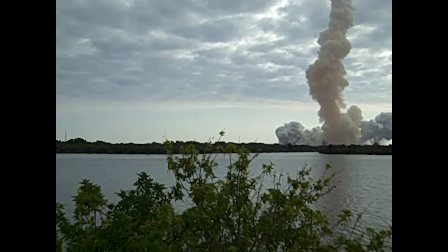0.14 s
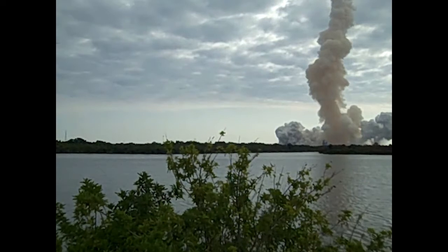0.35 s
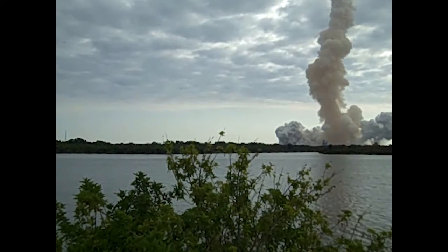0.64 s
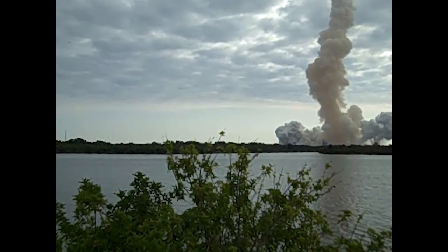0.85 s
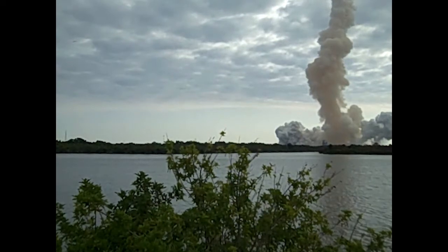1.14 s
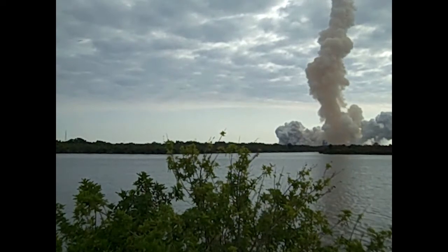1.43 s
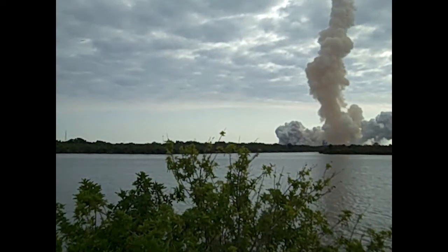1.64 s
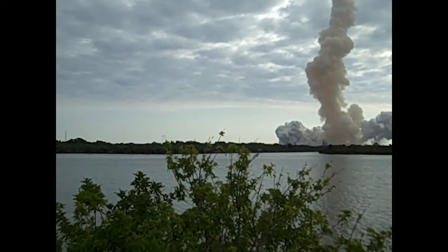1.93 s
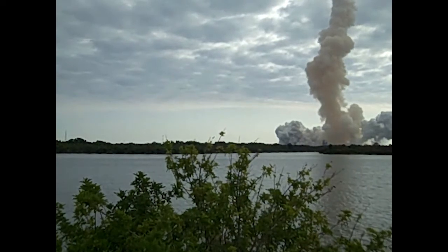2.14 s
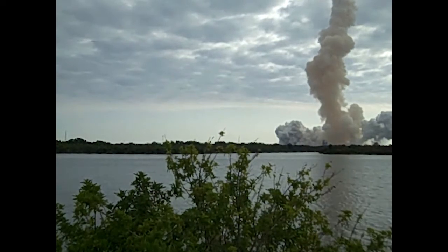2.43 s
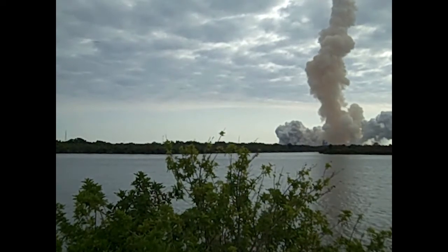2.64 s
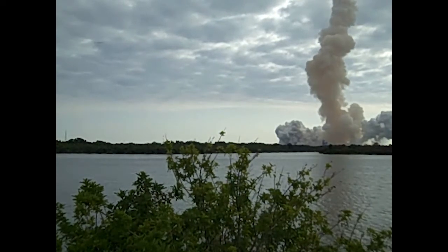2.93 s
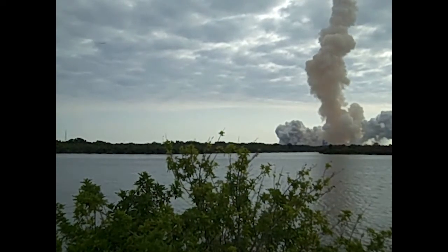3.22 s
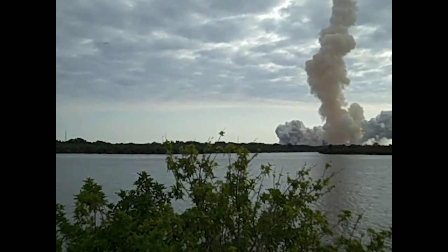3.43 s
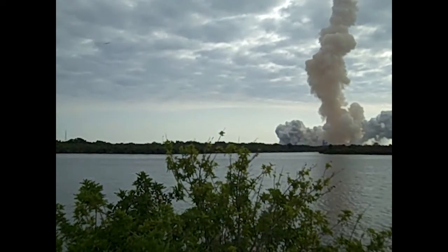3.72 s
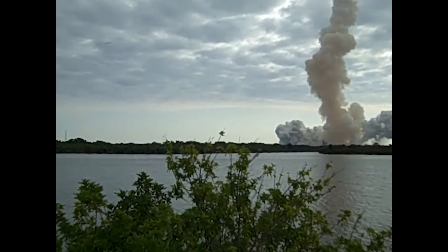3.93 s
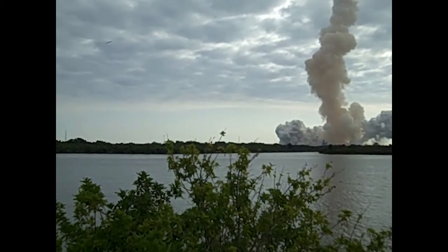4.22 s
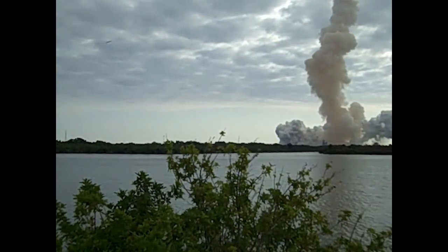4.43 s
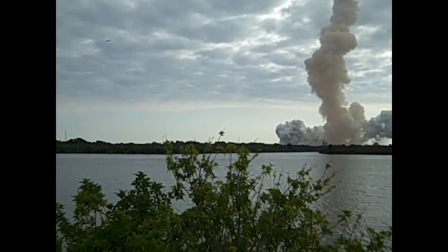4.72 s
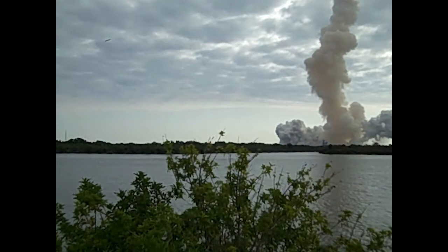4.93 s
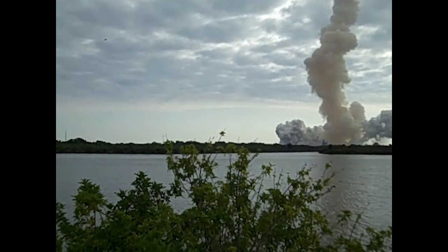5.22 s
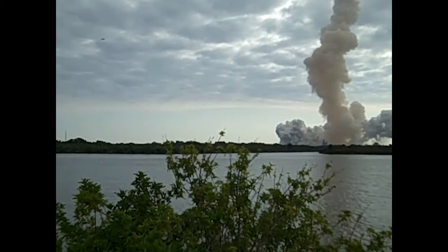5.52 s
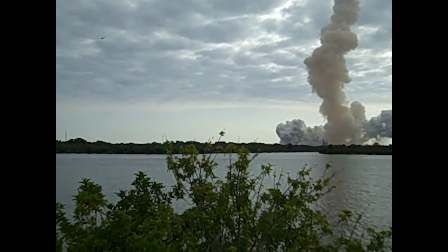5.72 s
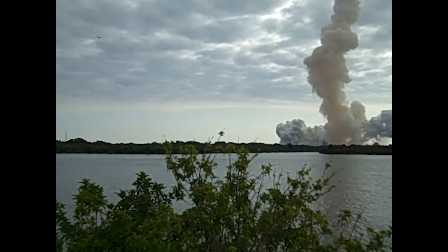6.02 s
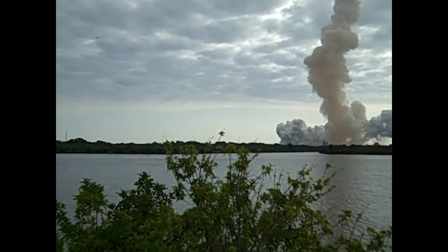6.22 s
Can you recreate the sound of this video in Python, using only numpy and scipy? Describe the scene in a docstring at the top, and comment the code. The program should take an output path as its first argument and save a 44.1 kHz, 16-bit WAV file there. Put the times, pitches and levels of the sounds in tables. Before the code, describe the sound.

A rocket climbs miles away across water, heard outdoors near bushes, with the roar already under way. From 0 to 1 s a low turbulent rumble is broken by rapid, uneven cracks, heavy and punchy with a short hollow ring. They thin slightly around 1.1-1.5 s, then surge from 1.7 to 2.4 s with some of the strongest blows, clipping the microphone. From 2.5 s they grow duller and sparser. Around 3.1-3.9 s the direct sound is shaded and weaker cracks arrive as bright rebounds. Near 4.1-4.4 s the crackle is faint; by 4.6 s it returns crisp and scattered, like leaves spitting. Around 5.2 s it is drier and snappy, with a very faint thin high whistle swelling briefly at 5.3 s. Until 6.3 s, mixed thuds and snaps trail sizzle and fizz over the continuing rumble, cutting off mid-roar.

```python
"""A rocket climbs, miles away across a lagoon: over a turbulent rumble its exhaust arrives as cracks, noise
steepened into shock fronts. Each rebounds close to the microphone and sets a hollow ring going; weak fronts
fill the gaps. Around 3.1-3.9 s the direct path is shaded and a bright rebound takes over; then leaves scatter
the fronts (4.6 s) and an open stretch leaves them dry (5.2 s), while a thin whistle swells once. A late sizzle
trails ever further behind each crack from 4.35 s. The strongest peaks clip."""
import sys
import numpy as np
from scipy import signal
from scipy.fft import rfft, irfft
from scipy.io import wavfile
from scipy.ndimage import uniform_filter1d

SR = 44100
rng = np.random.default_rng(int(sys.argv[2]) if len(sys.argv) > 2 else 0)


def master(y):
    """Save y as 16-bit WAV."""
    cut = np.clip(np.atleast_2d(y).T, -1, 1)
    pcm = np.round(cut * 32767)  # scale
    wavfile.write(sys.argv[1], SR, pcm.astype(np.int16))


N = 280470

# loud shock fronts: (time [s], relative level [dB], relative brightness [dB])
SHOCK_FRONTS = [(0.0183, -18, -11), (0.0612, -11.5, -2.5), (0.1297, -22, -1), (0.1706, -19, -15),
                (0.1984, -21, -16), (0.208, -21, -6), (0.241, -28, 3), (0.2941, -20, 1), (0.3336, -21.5, 2),
                (0.347, -21.5, 1), (0.3578, -9.5, -1), (0.413, -21, -13), (0.4356, -9, 2.5),
                (0.489, -20.5, -3), (0.524, -14.5, -8), (0.535, -14, 1.5), (0.557, -11, 0.5),
                (0.589, -14, 1), (0.64, -14.5, -10), (0.651, -19, 3.5), (0.6758, -15.5, -8),
                (0.708, -17.5, -8), (0.7529, -14.5, -6.5), (0.772, -8.5, 3), (0.805, -11, -2.5),
                (0.842, -11, 0.5), (0.914, -22, -10.5), (0.936, -13, 3), (0.982, -10.5, -2.5),
                (1.02, -24.5, -4.5), (1.036, -21, -13), (1.108, -25, -6.5), (1.1219, -18, -4),
                (1.241, -17, 0), (1.302, -22.5, -0.5), (1.317, -20, -3), (1.39, -28, -10),
                (1.4031, -19.5, -0.5), (1.449, -32, -14), (1.512, -26, -2), (1.552, -19, 3),
                (1.603, -15.5, 2.5), (1.6381, -17, 1), (1.6576, -17.5, 1), (1.6773, -16.5, 0),
                (1.699, -23, -5), (1.73, -5.5, 1), (1.766, -15.5, -4.5), (1.804, -13.5, -7),
                (1.8383, -12, -9.5), (1.907, -16, -15.5), (1.929, -16, -5), (1.956, -23, -28),
                (1.976, -11, -3.5), (2.0047, -16, -3.5), (2.0484, -9, 2.5), (2.086, -20, -11),
                (2.1005, -8.5, 1), (2.1502, -10.5, 3), (2.1876, -12.5, -7.5), (2.2348, -17.5, -16.5),
                (2.2802, -16, -10), (2.3048, -19, -8), (2.3836, -11.5, -3.5), (2.428, -26, -14),
                (2.4621, -11.5, -7.5), (2.514, -27, -10), (2.53, -20.5, -14.5), (2.5578, -19.5, -14),
                (2.598, -18.5, -14), (2.6674, -19.5, -12), (2.698, -17, -1.5), (2.72, -20.5, -15),
                (2.818, -27.5, -2), (2.908, -27, -15), (2.925, -16, 1), (2.9486, -32, -3), (2.959, -24, -2),
                (3.044, -26, -9), (3.075, -28.5, -8), (3.12, -25, -5.5), (3.152, -28, -4), (3.184, -23, -7),
                (3.2414, -18, 2.5), (3.2684, -22.5, 1.5), (3.2943, -20.5, 3), (3.3479, -27, 8.5),
                (3.374, -17, 8.5), (3.421, -25, 9), (3.4533, -20, 5), (3.546, -24, -2.5),
                (3.59, -27.5, 6.5), (3.6093, -28, 7.5), (3.6363, -18, 11.5), (3.6861, -20.5, 7),
                (3.784, -27, 0), (3.804, -20.5, 7.5), (3.893, -27.5, 5), (3.9841, -25.5, 4.5),
                (4.0168, -24, 0.5), (4.069, -29, -3), (4.1, -37, 18.5), (4.115, -25, 8.5),
                (4.15, -38.5, 13), (4.184, -38, 10), (4.253, -37, 11), (4.27, -27, 10.5), (4.307, -28, 13),
                (4.3275, -26.5, 6.5), (4.416, -35, 15.5), (4.424, -26.5, 11), (4.4347, -24.5, 16.5),
                (4.487, -25.5, 17.5), (4.519, -27, 5), (4.533, -21.5, 13), (4.5784, -19, 14.5),
                (4.606, -27, -3), (4.6338, -20.5, 17), (4.661, -26.5, 13), (4.679, -24.5, 8.5),
                (4.69, -30, 6), (4.7001, -21.5, 9.5), (4.741, -25, 13), (4.799, -18.5, 12),
                (4.8489, -21, 10.5), (4.865, -16.5, 14), (4.908, -26, 6), (4.938, -15, 14),
                (5.0315, -14.5, 13), (5.085, -23.5, 13), (5.1021, -21, 17), (5.1276, -20, 15),
                (5.141, -20.5, 5), (5.1719, -22, 13), (5.2141, -22.5, 13.5), (5.223, -22, 10),
                (5.244, -20, 10), (5.2751, -13.5, 12), (5.2787, -20.5, 15.5), (5.3215, -18.5, 13),
                (5.4131, -19, 9.5), (5.439, -24.5, 18.5), (5.446, -20.5, 16.5), (5.516, -22.5, 5),
                (5.569, -23, -2), (5.5774, -16, 11.5), (5.601, -18.5, 14), (5.658, -18, 7), (5.734, -29, 0),
                (5.7459, -19.5, -0.5), (5.782, -19.5, 3), (5.827, -28, -5), (5.841, -22.5, 2),
                (5.8704, -15, 3.5), (5.916, -26, -1), (5.941, -24.5, -4), (5.9884, -13, 10),
                (6.044, -22.5, -4), (6.107, -22, -7), (6.127, -22.5, -6), (6.173, -19.5, 7.5),
                (6.1927, -25.5, 3), (6.2106, -19.5, 1), (6.2578, -17.5, -2), (6.277, -28, 2.5),
                (6.307, -22.5, 5.5), (6.3485, -18.5, 6.5)]
SHOCK_S = np.transpose(SHOCK_FRONTS)[0]
# strength of the roar, followed by the weak fronts: (time [s], relative rumble [dB], relative rush [dB])
ROAR_STRENGTH = [(0.0, -26.5, -41.5), (0.45, -27.5, -48), (0.75, -29.5, -52.5), (1.22, -33, -50),
                 (1.45, -30, -51.5), (1.68, -22.5, -49.5), (1.87, -34, -45.5), (2.1, -30, -53),
                 (2.35, -36, -50.5), (2.82, -33.5, -54), (3.1, -32.5, -48.5), (3.45, -31, -47),
                 (3.94, -33.5, -48), (4.36, -29.5, -44), (4.68, -28, -41.5), (5.0, -30.5, -37.5),
                 (5.52, -29, -40.5), (6.36, -32.5, -44.5)]

SIZE = 8192  # samples in one response
TIME = np.arange(N) / SR
AGE = np.arange(SIZE) / SR
FREQ = np.maximum(np.fft.rfftfreq(SIZE, 1 / SR), 1)


def undb(db):
    """Decibels to gain."""
    return 10 ** (np.asarray(db) / 20)


def curve(table, t):
    """Columns of a table, interpolated at time t."""
    s, *columns = np.transpose(table)
    return [np.interp(t, s, c) for c in columns]


def colour(points, f):
    """dB of a spectrum at frequencies f, interpolated over log frequency."""
    hz, db = np.transpose(points)
    return np.interp(np.log(f), np.log(hz), db)


def above(f, hz):
    """Smooth crossover: 0 well below hz, 1 well above."""
    return 1 / (1 + (hz / f) ** 4)


def bump(hz, half_width_hz):
    """Resonance: 1 at its centre, 0 far from it."""
    return 1 / (1 + ((FREQ - hz) / half_width_hz) ** 2)


def ramp(t, middle_s, length_s):
    """Linear change from 0 to 1 around a moment."""
    return np.clip(.5 + (t - middle_s) / length_s, 0, 1)


def walk(rate_hz):
    """Random levels held 1 / rate_hz, smoothed twice, unit standard deviation."""
    k = int(SR / rate_hz)
    steps = np.repeat(rng.standard_normal(N // k + 1), k)
    w = uniform_filter1d(uniform_filter1d(steps, k), k)[:N]
    return w / w.std()


def causal(db):
    """Minimum-phase response of a dB spectrum: sudden start, then decay."""
    cepstrum = irfft(db * np.log(10) / 20)
    cepstrum[1:SIZE // 2] *= 2
    cepstrum[SIZE // 2 + 1:] = 0
    return np.exp(rfft(cepstrum))


def delay(ms):
    """Response of a travel time."""
    return np.exp(-2j * np.pi * FREQ * ms / 1000)


def spray(envelope, ragged_db, size=64):
    """Many small reflections under an envelope, bunched in snaps of size samples."""
    snap_db = ragged_db * np.repeat(rng.standard_normal(SIZE // size), size)
    envelope = envelope * undb(snap_db)
    unit = envelope / np.sqrt(np.sum(envelope ** 2))  # unit energy
    return rfft(rng.standard_normal(SIZE) * unit)


def add(out, t, sound):
    """Mix a sound in at time t."""
    i = int(np.clip(t * SR, 0, N - 1))
    out[i:i + len(sound)] += sound[:N - i]


def surge(lag_s=0.0095, width_s=0.021):
    """1 just after each loud front, 0 in the lulls between them."""
    points = []
    for t in TIME[::64]:
        off_s = np.abs(t - lag_s - SHOCK_S).min()
        points.append((t, np.exp(-(off_s / width_s) ** 2)))
    return curve(points, TIME)[0]


def roar(bass_hz=220, split_hz=680, rush_top_hz=8000,
         bass_gain_db=3.0, rumble_gain_db=-3, rush_gain_db=2.0, hiss_gain_db=-48,
         flutter_db=1.5, own_db=4.0, bass_flutter_db=1, lull_bass_db=-9, lull_rumble_db=-5):
    """Noise bands that sag in the lulls, the bass most, under a faint treble hiss that follows the rumble."""
    # spectrum before each band is normalised: (frequency [Hz], relative density [dB])
    roar_spectrum = [(20, -32), (48, -24), (65, -12.5), (90, -3.5), (128, -3), (160, -4), (205, -2),
                     (250, -7.5), (335, -0.5), (394, -4), (463, -4), (520, -13), (641, -7.5), (840, -13.5),
                     (1230, -18), (1740, -26), (2220, -30), (6050, -58), (16000, -51)]
    # bass under the roar: (time [s], relative level [dB])
    bass_level = [(0, -35.5), (1.7, -32.5), (2.3, -38), (3.0, -37), (3.7, -36.5), (4.8, -33), (5.4, -38.5),
                  (6.36, -45)]
    f = np.maximum(np.fft.rfftfreq(N, 1 / SR), 1)
    shape = undb(colour(roar_spectrum, f))
    middle, high, top = above(f, bass_hz), above(f, split_hz), above(f, rush_top_hz)
    rumble_db, rush_db = curve(ROAR_STRENGTH, TIME)
    bass_db, = curve(bass_level, TIME)
    lull = 1 - surge()
    flutter = flutter_db * walk(35) + lull_rumble_db * lull  # shared by all but the bass
    heave = bass_flutter_db * walk(14) + lull_bass_db * lull
    bands = (
        (1 - middle, bass_db + bass_gain_db + heave),
        (middle * (1 - high), rumble_db + rumble_gain_db + flutter + own_db * walk(90)),
        (high * (1 - top), rush_db + rush_gain_db + flutter + own_db * walk(90)),
        (high * top, rumble_db + hiss_gain_db + flutter),  # faint treble hiss
    )
    out = np.zeros(N)
    for band, db in bands:
        noise = irfft(rfft(rng.standard_normal(N)) * shape * band, N)
        out += noise / noise.std() * undb(db)
    return out


def front(t, db, bright_db, split_hz=620, steepening=0.051, typical_db=-20, edge_depth_db=-24,
          punch_width_hz=85, hollow_width_hz=40, snap_width_hz=170, tint_db=1.3):
    """One pressure jump: the stronger, the steeper its edge and the higher its treble reaches."""
    # colour of one front: (frequency [Hz], relative level [dB])
    front_spectrum = [(25, -32.5), (55, -23.5), (90, -4), (128, -6.5), (160, -7.5), (205, -7.5),
                      (250, -6.5), (355, -3), (515, -9.5), (640, -10), (950, -16), (1350, -15), (1700, -26),
                      (2050, -20.5), (2600, -27.5), (3300, -30.5), (4500, -37.5), (5300, -39),
                      (6100, -44.5), (16000, -41)]
    # slow change of tone: (time [s], nominal treble corner [Hz], midrange punch centre [Hz],
    # punch strength [dB], hollow body centre [Hz], hollow body strength [dB])
    tone_drift = [(0, 6900, 710, 4.5, 398, 7.5), (1.0, 7350, 720, 1.5, 383, 6.5),
                  (1.8, 7000, 690, 5, 336, 6), (2.4, 6900, 655, 8.5, 320, 6),
                  (2.9, 6000, 613, -0.5, 313, 9.5), (3.3, 3820, 613, 7, 321, 5.5),
                  (4.9, 4110, 708, 8.5, 338, 7), (5.3, 3920, 724, -0.5, 336, 1.5),
                  (6.36, 3680, 695, 11, 355, 3.5)]
    # two snap resonances, wandering as the rocket climbs:
    # (time [s], lower centre [Hz], lower strength [dB], upper centre [Hz], upper strength [dB])
    snap_drift = [(0.2, 1320, 3, 2150, 2), (1.2, 1330, 0, 2210, 1), (2.3, 1620, -2, 2260, -2.5),
                  (3.0, 1150, 4, 2100, 0), (3.6, 1720, 2.5, 2050, -5), (4.1, 1350, -3, 2050, 4.5),
                  (4.55, 1250, -4.5, 2120, 4.5), (4.95, 1380, -6, 2060, -0.5), (5.25, 1410, 0, 2020, 0.5),
                  (5.7, 1250, -1.5, 2070, -1.5), (6.3, 1020, 4, 2100, -5.5)]
    edge_hz, punch_hz, punch_db, hollow_hz, hollow_db = curve(tone_drift, t)
    lower_hz, lower_db, upper_hz, upper_db = curve(snap_drift, t)
    treble = above(FREQ, split_hz)
    corner_hz = edge_hz * 2 ** (steepening * (db + bright_db - typical_db))
    edge = edge_depth_db * above(FREQ, 1.042 * corner_hz)
    body = punch_db * bump(punch_hz, punch_width_hz) + hollow_db * bump(hollow_hz, hollow_width_hz)
    snap = lower_db * bump(lower_hz, snap_width_hz) + upper_db * bump(upper_hz, snap_width_hz)
    # turbulent air colours each front its own way, in thirds of an octave
    octaves = np.arange(0, np.log2(SR), 1 / 3)
    tint = tint_db * treble * np.interp(np.log2(FREQ), octaves, rng.standard_normal(len(octaves)))
    return causal(db + colour(front_spectrum, FREQ) + bright_db * treble + edge + body + snap + tint)


def surroundings(t, dull_hz=800, rebound_db=-10.0, scatter_s=0.005, tail_s=0.021, tail_below_db=-12,
                 sizzle_hz=3200, sizzle_top_hz=7000, sizzle_s=0.0028, fizz_hz=4000, fizz_s=0.089):
    """Direct path, rebounds, ragged scatter from bushes, a late patch of treble and a fizzing tail."""
    # dull rebounds close by: (nominal lag [ms], relative level [dB])
    dull_rebounds = [(2.95, -10), (5.902, -11)]
    # sizzle behind the cracks: (time [s], relative level [dB])
    sizzle_level = [(2.9, -39), (3.8, -3.5), (5.0, -0.5), (5.13, -17), (5.5, -16), (5.75, 11), (6.2, -11.5)]
    # fizzing tail of each crack: (time [s], relative level [dB])
    fizz_level = [(0, -22), (1.7, -16.5), (2.4, -25.5), (4.0, -22.5), (4.6, -2.5), (5.0, -12), (5.3, -17),
                  (5.6, -12), (6.36, 0)]
    shade_end_s, shade_out_s = 3.95, 0.43
    shade = ramp(t, 3.1, 0.2) - ramp(t, shade_end_s, shade_out_s)
    past_shade = ramp(t, shade_end_s + shade_out_s, shade_out_s)
    leafy = np.exp(-((t - 4.62) / 0.3) ** 2)
    open_stretch = np.exp(-((t - 5.24) / 0.22) ** 2)
    direct_db = -4.5 - 11.5 * shade - 8 * leafy
    treble_db = -16 + 16.5 * shade - 13 * past_shade  # treble of the main rebound
    scatter_db = -3.5 + 3 * leafy - 7 * open_stretch
    # long waves bend round obstacles: only the treble of a path is shaded
    treble = above(FREQ, dull_hz)
    direct = causal(direct_db * treble)
    near = causal(-20 * treble) * sum(
        undb(db) * delay(ms * (1 + 0.084 * rng.standard_normal())) for ms, db in dull_rebounds)
    rebound_ms = 8.3 + 1.347 * shade + 0.093 * rng.standard_normal()
    rebound = causal(rebound_db * (1 - treble) + treble_db * treble) * delay(rebound_ms)
    # leaves and twigs scatter short waves and pass long ones; no two fronts scatter alike
    strength, length = rng.standard_normal(2)
    decay_s = scatter_s * 2 ** (0.3 * length)
    scatter_band = scatter_db + 1.2 * strength - 12 * (1 - above(FREQ, 770))
    scatter = causal(scatter_band) * spray(np.exp(-AGE / decay_s), ragged_db=5.5)
    tail_envelope = np.exp(-AGE / tail_s) * (1 - np.exp(-AGE / scatter_s))
    tail = undb(scatter_db + tail_below_db) * spray(tail_envelope, ragged_db=3.5)
    # the sizzle trails ever further behind
    sizzle_db, = curve(sizzle_level, t)
    sizzle_ms = 13.8 + 7.1 * max(t - 4.35, 0)
    off_peak_s = np.abs(AGE - sizzle_ms / 1000)
    sizzle_band = -30 * (1 - above(FREQ, sizzle_hz)) + 5 * (1 - above(FREQ, sizzle_top_hz))
    sizzle = causal(sizzle_db + sizzle_band) * spray(np.exp(-off_peak_s / sizzle_s), ragged_db=3.0)
    fizz_db, = curve(fizz_level, t)
    fizz_band = causal(-18 * (1 - above(FREQ, fizz_hz)))
    fizz = undb(fizz_db) * fizz_band * spray(np.exp(-AGE / fizz_s), ragged_db=9)
    return direct + near + rebound + scatter + tail + sizzle + fizz


def crackle(count, spread_db, bright_offset_db, swallow_db, swallow_s=0.019):
    """Weak fronts at random times follow the roar; a loud front swallows those close to it."""
    out = np.zeros(N)
    for k, (place, size, tint) in enumerate(rng.standard_normal((count, 3))):
        t = np.clip((k + .5 + .3 * place) / count, 0, 1) * N / SR
        rumble_db, rush_db = curve(ROAR_STRENGTH, t)
        closeness = np.exp(-(np.abs(t - SHOCK_S).min() / swallow_s) ** 2)
        db = rumble_db + spread_db * size + swallow_db * closeness
        bright_db = rush_db - rumble_db + bright_offset_db + 2 * tint
        add(out, t, irfft(front(t, db, bright_db) * surroundings(t)))
    return out


def shocks(gain_db=42):
    """Loud cracks: steepened fronts, each by its own paths."""
    out = np.zeros(N)
    for t, db, bright_db in SHOCK_FRONTS:
        add(out, t, irfft(front(t, db, bright_db) * surroundings(t)))
    return undb(gain_db) * out


def ring(x, gain_db=-18.0):
    """The fronts excite a few low, hollow, exponentially decaying resonances."""
    # hollow modes: (frequency [Hz], relative level [dB], 60 dB decay time [s])
    hollow_modes = [(321, -35.5, 0.075), (461, -32, 0.095), (106, -39.5, 0.028)]
    response = np.zeros(SIZE)
    for hz, db, t60_s in hollow_modes:
        decay = np.exp(-np.log(1000) * AGE / t60_s)
        response += undb(db) * np.cos(2 * np.pi * hz * AGE) * decay
    return x + undb(gain_db) * signal.fftconvolve(x, response)[:N]


def whistle(centre_hz=2871, waver=0.0025, rough_db=1.1):
    """Thin sine of wavering pitch that creeps in, swells unsteadily and fades."""
    # swell before roughness: (time [s], RMS level [dB])
    whistle_level = [(5.13, -68), (5.21, -58), (5.25, -56), (5.31, -46), (5.35, -53), (5.39, -58),
                     (5.49, -69)]
    hz = centre_hz * (1 + waver * walk(90))
    s, db = np.transpose(whistle_level)
    swell = np.interp(TIME, s, undb(db), left=0, right=0)
    tone = np.sqrt(2) * np.sin(2 * np.pi * np.cumsum(hz) / SR)
    return tone * swell * undb(rough_db * walk(120))


def scene():
    """All layers together; the fronts alone drive the ring."""
    roar_and_hiss = roar()
    fine = undb(35.5) * crackle(count=260, spread_db=3.5, bright_offset_db=14, swallow_db=-4)
    lesser = undb(39.5) * crackle(count=130, spread_db=2.0, bright_offset_db=9.0, swallow_db=-13.0)
    fronts = ring(shocks() + lesser + fine)
    return (fronts + roar_and_hiss + whistle())[None]


def record(dry, hiss_db=-78.5, clip_level=.71, top_hz=16200):
    """The microphone hisses faintly, flattens the highest peaks and cuts the top."""
    hiss = undb(hiss_db) * rng.standard_normal(dry.shape)
    clipped = np.clip(dry + hiss, -clip_level, clip_level)
    top_cut = signal.ellip(8, .2, 70, top_hz, fs=SR, output="sos")
    return signal.sosfilt(top_cut, clipped)


dry = scene()
out = record(dry)
master(out)
```